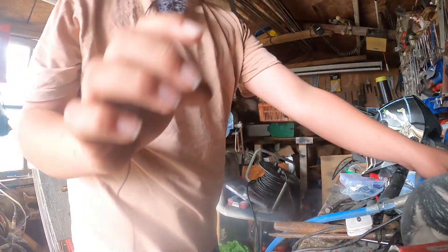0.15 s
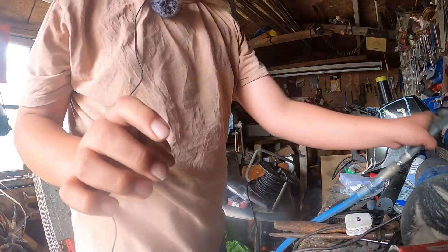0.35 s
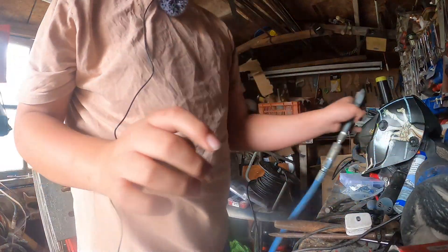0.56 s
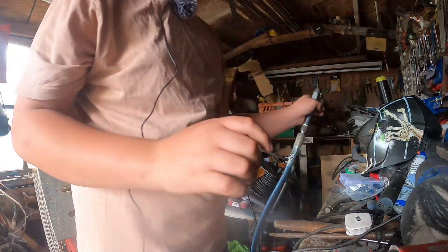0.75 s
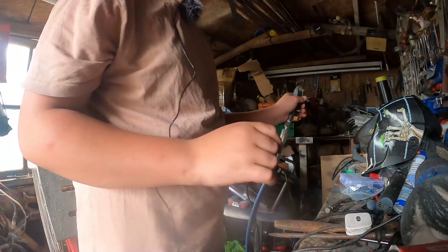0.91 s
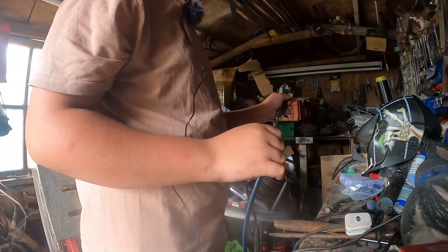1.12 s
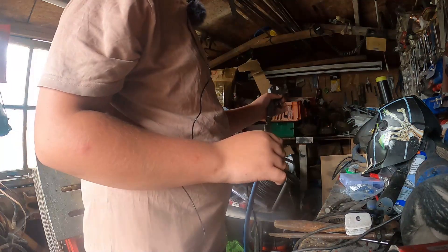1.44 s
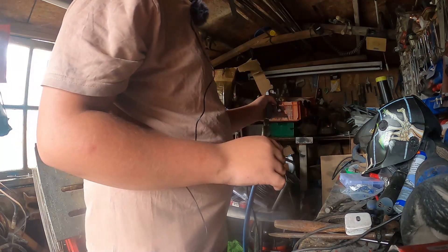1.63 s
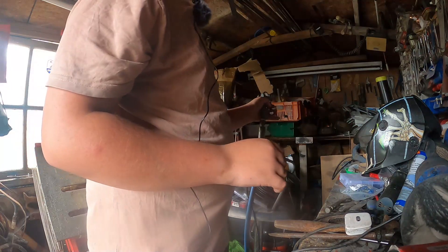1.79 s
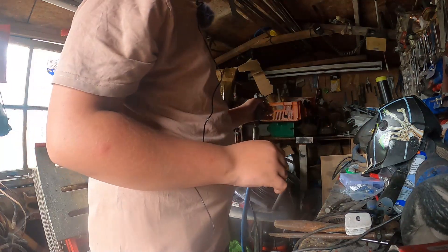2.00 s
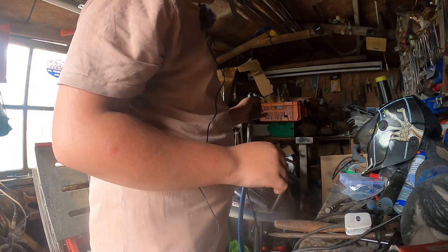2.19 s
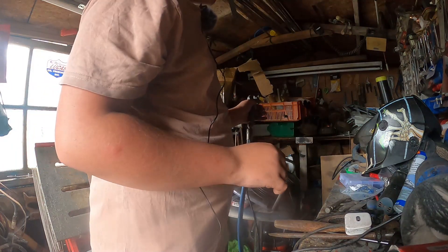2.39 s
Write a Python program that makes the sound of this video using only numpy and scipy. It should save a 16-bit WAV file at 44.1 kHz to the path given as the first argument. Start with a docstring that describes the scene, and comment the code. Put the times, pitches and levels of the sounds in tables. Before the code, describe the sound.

An electric air compressor runs throughout in a small shed, with a steady hum, a fast pumping throb, clatter and hissing air. From about 0.6 to 1 second the tone shifts and brightens slightly as the microphone turns. The motor then slows very slightly, while a faint, thin, high whistle swells to a peak near 1.9 seconds and fades by 2.5 seconds.

```python
"""An electric air compressor is already running in a cluttered shed. Over the rumble of its casing, each
turn of the crank gives a pumping throb, a clatter and a rush of air; a steady tone beats with the throb.
Just over half a second in, the wearer of the shirt microphone turns, which shifts the balance of the
tones and opens up the treble. The motor then slows a little as the tank fills, and a thin whistle
swells to its peak near two seconds and falls away."""
import sys
import numpy as np
from scipy import signal
from scipy.fft import rfft, irfft
from scipy.io import wavfile

SR = 44100
rng = np.random.default_rng(int(sys.argv[2]) if len(sys.argv) > 2 else 0)


def to_wav(sig):
    """Store sig (one row per channel, or 1-D mono) as 16-bit WAV at the path in sys.argv[1].

    Samples outside -1..1 are clipped; the rate is SR.
    """
    pcm = np.clip(np.atleast_2d(sig), -1, 1) * 32767
    pcm = np.round(pcm).astype(np.int16)
    wavfile.write(sys.argv[1], SR, pcm.T)  # frames by channels


N = 112454

# The crank's pace, sagging as the tank fills. Each row: time in seconds, speed in turns per second.
CRANK_SPEED = [(0, 70.05), (.75, 70.12), (1.45, 69.62), (2.55, 69.27)]


def undb(db):
    """Decibels to gain."""
    return 10 ** (np.asarray(db) / 20)


def unit(x):
    """Scale to rms 1."""
    return x / np.sqrt(np.mean(x ** 2))


def curve(table):
    """An automation line through rows of time in seconds and value."""
    return np.interp(np.arange(N) / SR, *np.array(table).T)


def freqs():
    """Frequency of each spectral bin, at least 1 Hz."""
    return np.maximum(np.arange(N // 2 + 1) * SR / N, 1)


def shape(x, gain):
    """Filter with one gain per spectral bin."""
    return irfft(rfft(x) * gain, N)


def noise(table):
    """Noise coloured by rows of frequency in Hz and level in dB per Hz."""
    hz, db = np.array(table).T
    gain = undb(np.interp(np.log(freqs()), np.log(hz), db))
    return shape(rng.standard_normal(N), gain) * np.sqrt(SR / 2)


def drift(rate):
    """A smooth random waver of rms 1, changing about rate times a second."""
    return unit(shape(rng.standard_normal(N), 1 / (1 + (freqs() / rate) ** 2) ** 2))


def ring(hz, width):
    """A resonance kept ringing by turbulence, rms 1."""
    return unit(shape(rng.standard_normal(N), 1 / (1 + ((freqs() - hz) / width) ** 2)))


def shed(x, t60_s=0.23, wet_db=-5):
    """Direct sound plus a short wash of reflections, at unchanged power."""
    t = np.arange(SR // 2) / SR
    tail = rng.standard_normal(len(t)) * np.exp(-np.log(1000) * t / t60_s)
    wet = shape(x, rfft(tail / np.linalg.norm(tail), N))
    return (x + undb(wet_db) * wet) / np.hypot(1, undb(wet_db))


def casing_rumble():
    """Motor and casing shake, laying a low bed of noise into the shed."""
    # The rumble's colour. Each row: frequency in Hz, level in dB per Hz.
    spectrum = [(20, -94), (80, -91), (200, -95), (260, -80.5), (310, -93), (400, -73), (520, -76.5),
                (660, -81), (900, -75), (1230, -76.5), (1500, -85.5), (2500, -110)]
    return shed(noise(spectrum))


def pump(crank, valve_from_multiple=10, valve_lag_turns=0.3049):
    """One tight throb per turn, then the brighter, looser valve stroke, both locked to the crank."""
    # The pump's harmonics. Each row: multiple of the crank speed, then level in dB at each of the # three times
    # below: early, just after the microphone turns, and late as the levels drift.
    harmonics = [(1, -43.5, -42.5, -44.0), (2, -53.5, -56.0, -58.5), (3, -65.5, -66.0, -67.5),
                 (4, -45.5, -46.0, -47.5), (5, -49.5, -49.5, -49.5), (6, -41.5, -41.5, -42.5),
                 (7, -41.5, -39.5, -39.5), (8, -54.0, -55.0, -58.0), (9, -49.5, -51.5, -51.5),
                 (10, -57.5, -57.5, -54.0), (11, -53.0, -55.5, -58.0), (12, -58.0, -57.0, -52.0),
                 (13, -43.0, -45.5, -46.0), (14, -69.0, -63.0, -59.5), (15, -52.0, -49.5, -48.0),
                 (16, -66.0, -58.0, -56.5), (17, -57.5, -50.5, -54.5), (18, -58.5, -56.5, -60.0),
                 (20, -63.0, -62.5, -64.5), (24, -65.0, -63.0, -66.0), (25, -70.0, -63.0, -60.5)]
    level_times_s = (0.73, 1.09, 2.25)
    throb_scatter, valve_scatter = 0.61, 0.96  # radians by which the shed scatters the phases
    out = 0
    for k, *levels in harmonics:
        waver_db = 0.29 * min(k / 4, 2) * drift(2.6)
        level_db = curve(list(zip(level_times_s, levels))) + waver_db
        lag, scatter = (valve_lag_turns, valve_scatter) if k >= valve_from_multiple else (0, throb_scatter)
        phase = k * (crank - 2 * np.pi * lag) + scatter * rng.standard_normal()
        out += undb(level_db) * np.sin(phase)
    return np.sqrt(2) * out


def clatter(crank, turned, low_hz=1850, high_hz=4700, level_db=-55):
    """Piston and valves rattle alike on every stroke; the pattern shifts as the microphone turns."""
    start_speed = CRANK_SPEED[0][1]
    out = 0
    for k in range(int(low_hz / start_speed), int(high_hz / start_speed)):
        # Each harmonic crossfades between two random settings of strength and phase.
        before, after = (complex(*pair) for pair in rng.standard_normal((2, 2)))
        weight = before * np.sqrt(1 - turned) + after * np.sqrt(turned)
        out += (weight * np.exp(1j * k * crank)).real / np.sqrt(k)
    return undb(level_db) * unit(out)


def air_rush(crank, turned, trim_db=0.5, pulse_depth=0.11):
    """Air pulses with the crank and rings the valves and pipe; it brightens as the microphone turns."""
    # Intake and valve hiss, shaded by the wearer's body, then open after the turn.
    # Each row: frequency in Hz, level in dB per Hz ahead of the trim.
    shaded_spectrum = [(700, -105), (1400, -87), (1900, -83), (3100, -82.5), (3900, -82), (4650, -86.5),
                       (5600, -90.5), (7300, -95.5), (9500, -98.5), (12800, -100.5), (15500, -116)]
    open_spectrum = [(700, -105), (1400, -88), (1900, -82), (3100, -83.5), (4000, -79), (4650, -82),
                     (5500, -91), (7300, -94), (9500, -97), (12800, -98), (15500, -114)]
    # Valve and pipe resonances. Each row: pitch in Hz, width in Hz, level in dB before and after the turn.
    resonances = [(1920, 48, -58, -63), (2685, 96, -61, -64), (8050, 98, -71, -67.5),
                  (12750, 120, -82, -75)]
    # A narrow metallic ring that comes and goes. Each row: time in seconds, level in dB.
    metal_levels = [(0, -52), (.2, -68), (.6, -75), (.88, -51), (1.15, -58), (1.5, -66), (2.1, -60),
                    (2.3, -53), (2.55, -59)]
    hiss = noise(shaded_spectrum) * np.sqrt(1 - turned) + noise(open_spectrum) * np.sqrt(turned)
    out = shed(hiss) * undb(trim_db)
    for hz, width, before_db, after_db in resonances:
        out += ring(hz, width) * undb(before_db + (after_db - before_db) * turned)
    out += ring(hz=4040, width=15) * undb(curve(metal_levels))
    pulses = (np.cos(2 * crank) + np.cos(4 * crank)) / 2
    return out * (1 + pulse_depth * pulses)


def motor_tone(crank, multiple=4.777, level_db=-53.5):
    """A steady tone just under the pump's fifth harmonic, beating against it."""
    return np.sqrt(2) * undb(level_db + 0.7 * drift(5)) * np.sin(multiple * crank)


def whistle(pitch_hz=8320, waver_hz=11.7, waver_db=0.6):
    """A thin, unsteady whistle of air that swells and fades."""
    # The whistle's swell. Each row: time in seconds, level in dB.
    swell = [(0, -85), (.9, -71), (1.25, -68), (1.48, -62.5), (1.88, -59), (2.03, -61), (2.13, -71),
             (2.37, -66), (2.55, -78)]
    hz = pitch_hz + waver_hz * drift(63)
    level_db = curve(swell) + waver_db * drift(30)
    return np.sqrt(2) * undb(level_db) * np.sin(2 * np.pi * np.cumsum(hz) / SR)


def scene(turn_start_s=0.61, turn_end_s=1.0, speed_wobble=0.0006):
    """The crank sets the machine's rhythm; one microphone feeds both ears."""
    speed = curve(CRANK_SPEED) * (1 + speed_wobble * drift(13.7))
    crank = 2 * np.pi * np.cumsum(speed) / SR  # angle in radians
    turned = curve([(turn_start_s, 0), (turn_end_s, 1)])  # how far the wearer has come round
    machine = pump(crank) + motor_tone(crank) + casing_rumble() + clatter(crank, turned)
    mix = machine + air_rush(crank, turned) + whistle()
    return np.array([mix, mix])


def record(dry):
    """A steep low-pass takes off the very top, above 15650 Hz."""
    return signal.sosfilt(signal.ellip(10, .1, 80, 15650, fs=SR, output="sos"), dry)


dry = scene()
out = record(dry)
to_wav(out)
```